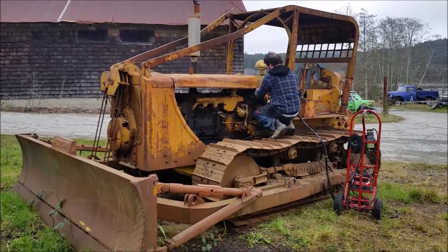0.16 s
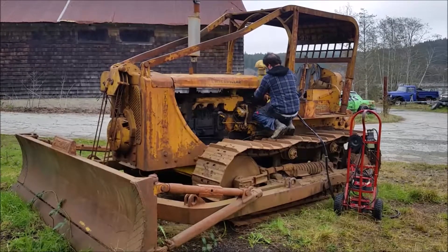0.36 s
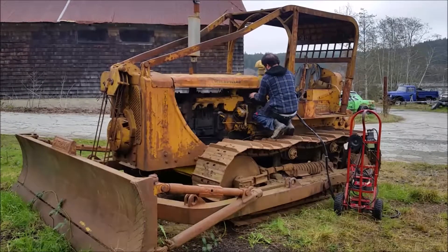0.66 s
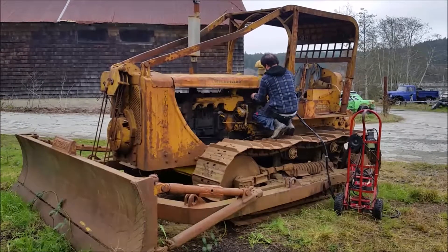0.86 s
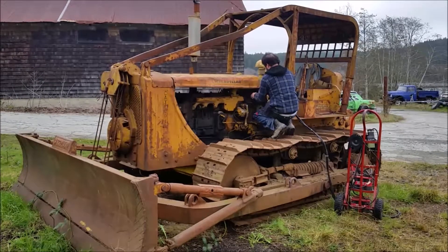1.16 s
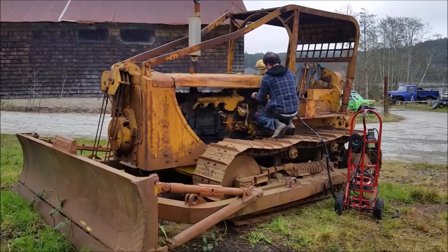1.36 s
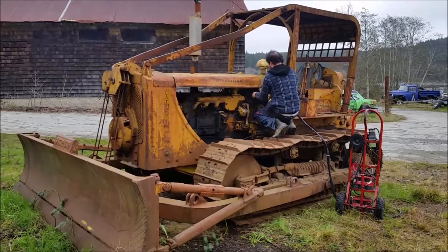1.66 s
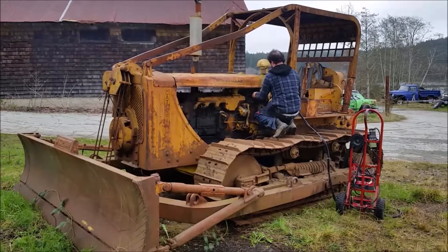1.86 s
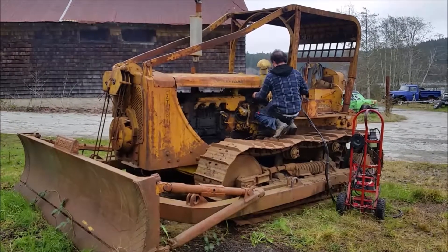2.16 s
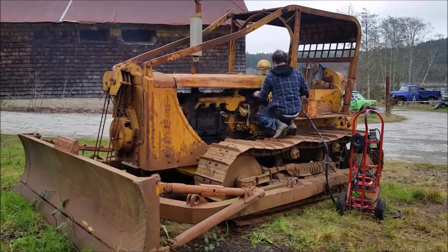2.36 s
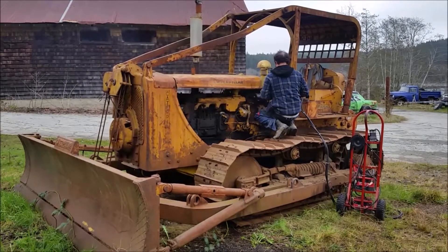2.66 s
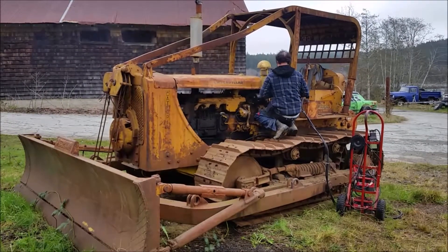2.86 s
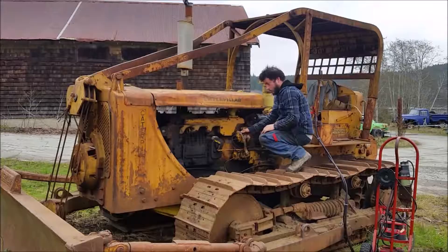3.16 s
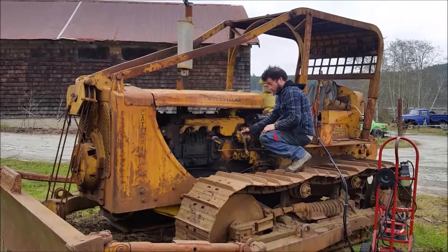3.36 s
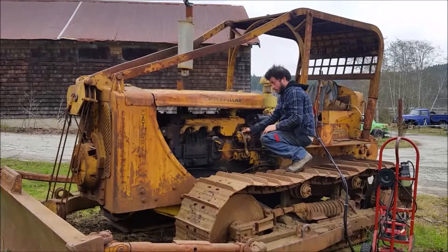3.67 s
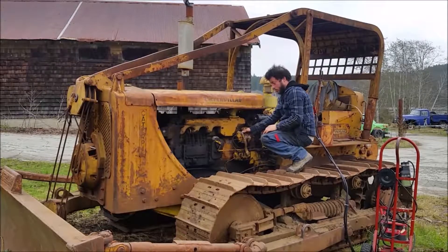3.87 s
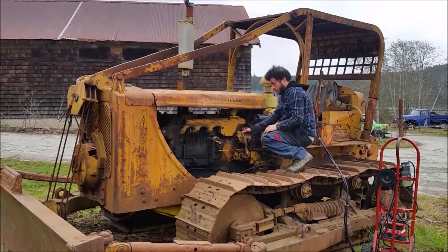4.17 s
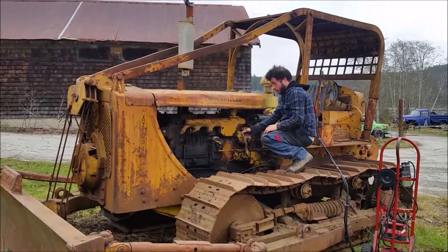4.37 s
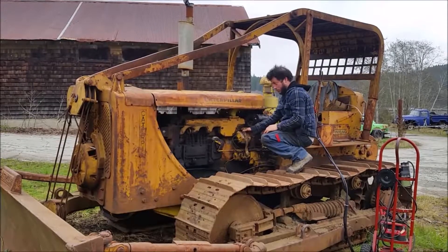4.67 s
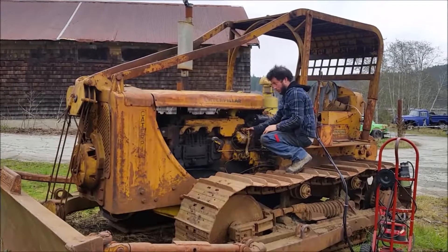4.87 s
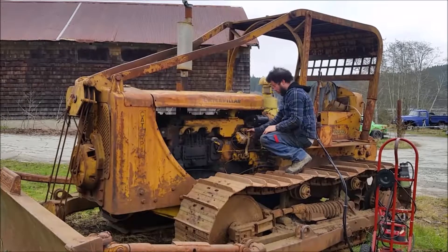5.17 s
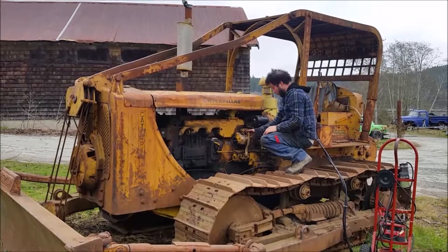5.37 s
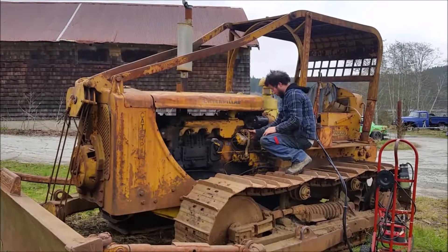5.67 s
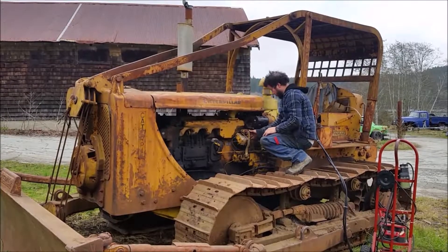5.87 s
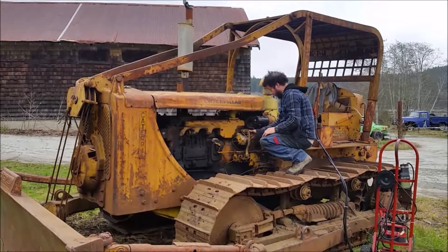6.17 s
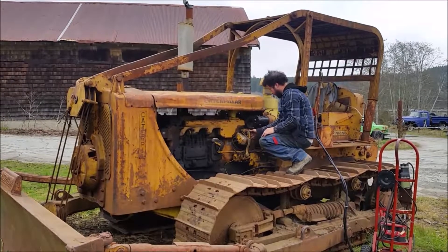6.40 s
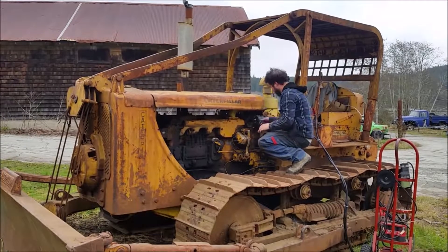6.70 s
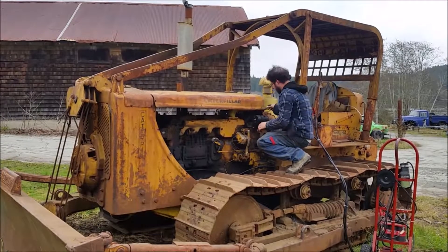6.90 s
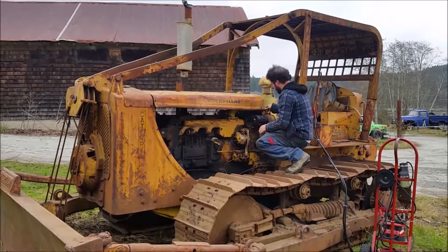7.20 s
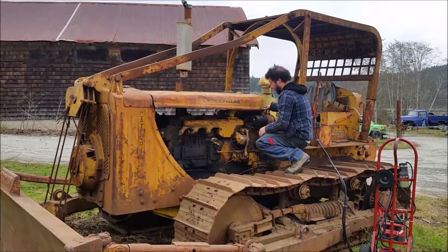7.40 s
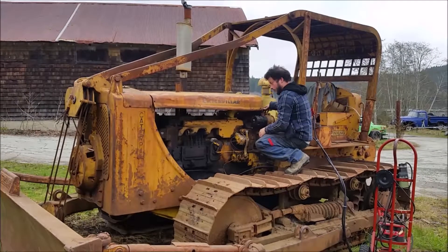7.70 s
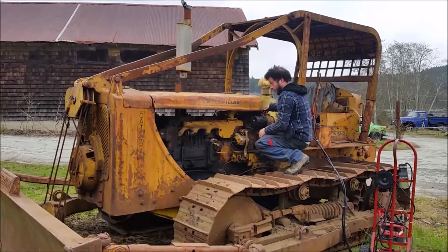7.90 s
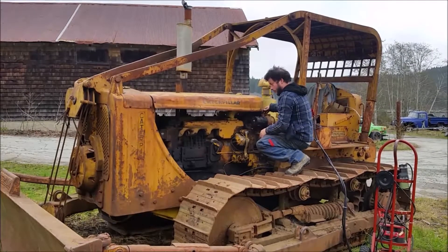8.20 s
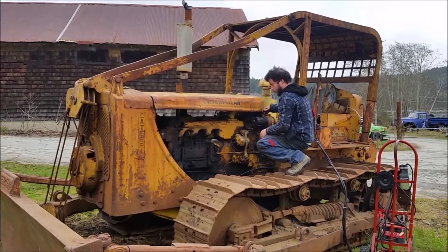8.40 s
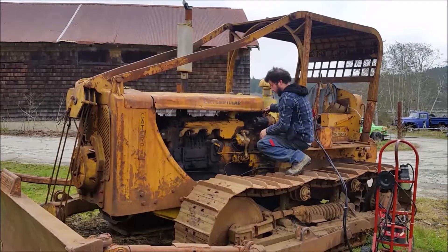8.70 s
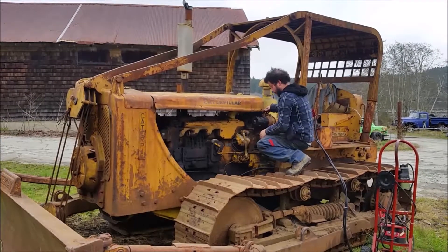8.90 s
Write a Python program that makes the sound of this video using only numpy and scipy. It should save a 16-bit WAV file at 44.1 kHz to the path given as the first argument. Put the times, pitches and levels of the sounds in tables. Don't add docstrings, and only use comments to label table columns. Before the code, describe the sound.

In an open yard, a soft distant engine idles with low pipe beats. A solenoid ticks, a starter grinds and heaves briefly, and an old diesel bulldozer catches with irregular knocks and puffs that quicken. The sound cuts nearly to silence, then fades in from closer: the diesel slows, misfires, and climbs to a fast, hard knocking idle. Outdoor stereo microphone, with dulled top treble.

```python
import sys
import numpy as np
from scipy import signal
from scipy.io import wavfile

SR = 44100
rng = np.random.default_rng(int(sys.argv[2]) if len(sys.argv) > 2 else 0)


def wav_record(signal):
    frames = np.transpose(np.atleast_2d(signal))
    bounded = np.clip(frames, -1, 1)
    quanta = np.round(bounded * 32767).astype(np.int16)
    wavfile.write(sys.argv[1], SR, quanta)


def natural_amplitude(level_db):
    exponent = np.asarray(level_db, float) / 20
    return 10 ** exponent


N = 399091
FAR_END = round(3.27 * SR)

# pitch in Hz, level in dB per Hz.
STARTER_NOISE = [(120, -22), (200, -1), (401, -5), (538, -0.5), (647, 1), (1810, -13), (2420, -19.5),
                 (7540, -18.5), (16000, -20.5)]


def rms_one(x):
    return x / np.sqrt(np.mean(x ** 2) + 1e-20)


def in_time(rows):
    s, *columns = np.transpose(rows)
    return [np.interp(np.arange(N) / SR, s, c, left=-200, right=-200) for c in columns]


def at_hz(points, hz):
    return np.interp(np.log(hz), np.log(np.array(points)[:, 0]), np.array(points)[:, 1])


def clicks(times, sizes):
    out = np.full(N, 1e-18)
    at = np.round(np.asarray(times) * SR).astype(int)
    out[at[at >= 0]] = np.asarray(sizes)[at >= 0]
    return out


def die(x, t60):
    return signal.lfilter([1], [1, -natural_amplitude(-60 / (t60 * SR))], x)


def resonate(x, hz, width_hz):
    r = np.exp(-np.pi * width_hz / SR)
    top = np.array([1, 0, -1]) * (1 - r * r) / 2
    return signal.lfilter(top, [1, -2 * r * np.cos(2 * np.pi * hz / SR), r * r], x)


def flicker(rate, part):
    steps = rng.standard_normal(int(N / SR * 60) + 2)
    steps = signal.lfilter([1], [1, -np.exp(-rate / 10)], steps)
    at = np.arange(part.start, part.stop) * 60 / SR
    return np.interp(at, np.arange(len(steps)), rms_one(steps))


def pair(white, hz, balance=None, likeness=None, lead=None):
    # pitch in Hz, left minus right in dB.
    usual_balance = [(60, 4), (250, -6.5), (640, -7.5), (1410, -15), (3100, -15.5), (6500, -34.5),
                     (9500, -6.5), (14000, -14.5)]
    # pitch in Hz, likeness of left and right (1 is the same).
    usual_likeness = [(60, 0.54), (250, 0.82), (500, 0.65), (1000, 0.94), (2000, 0.79), (4000, 0.56),
                      (15000, 0.28)]
    # pitch in Hz, lead of the left in radians.
    usual_lead = [(0, 0), (2150, 0.79), (3450, 5.5), (4050, -9.5), (4910, 4.5), (8960, 63), (11500, 22.5),
                  (16500, 35)]
    balance, likeness, lead = balance or usual_balance, likeness or usual_likeness, lead or usual_lead
    alike, tilt_db = np.clip(at_hz(likeness, hz), -1, 1), at_hz(balance, hz)
    left, right = np.sqrt(1 + alike) * white[0] + np.sqrt(1 - alike) * white[1] * [[1], [-1]]
    left = np.roll(left, -round(np.interp(hz, *np.transpose(lead)) * SR / (2 * np.pi * hz)))
    return np.array([left * natural_amplitude(tilt_db), right]) * 2 / (1 + natural_amplitude(tilt_db))


def hiss(spectrum, shape, part, **ports):
    low, high = spectrum[0][0], spectrum[-1][0]
    edges = np.geomspace(low, high, int(2.1 * np.log2(high / low)) + 1)
    white, out, power = rng.standard_normal((2, 2, part.stop - part.start)), np.zeros((2, N)), 0
    for k, band in enumerate(zip(edges, edges[1:])):
        hz = np.sqrt(band[0] * band[1])
        band_gain = natural_amplitude(at_hz(spectrum, hz))
        band_filter = signal.butter(2, band, "band", fs=SR, output="sos")
        noise = signal.sosfilt(band_filter, white[k % 2])
        out[:, part] += band_gain * pair(noise, hz, **ports) * shape(hz)
        power += band_gain ** 2 * (band[1] - band[0]) * 4.4 / SR
    return out / np.sqrt(power)


def body(modes, shape, part, strike=None):
    white, out = rng.standard_normal((2, 2, part.stop - part.start)), np.zeros((2, N))
    for k, (hz, width_hz, level_db) in enumerate(modes):
        ringing = resonate(white[k % 2] * shape(hz), hz, width_hz)
        if strike is not None:
            ringing[0] += resonate(strike, hz, 5 * width_hz)
        out[:, part] += natural_amplitude(level_db) * pair(ringing, hz) * (-1) ** k
    return out


def low_ports(x):
    return x * natural_amplitude(np.array([[-.7], [.7]]))


def idler():
    # pitch in Hz, level in dB per Hz.
    yard_colour = [(82, -4.5), (140, 1), (213, -15.5), (246, -10), (346, -33.5), (389, -28), (525, -27),
                   (1620, -29), (1920, -25.5), (2080, -38), (3200, -51), (4160, -76), (7040, -120)]
    # pitch in Hz, level in dB per Hz.
    air_colour = [(1760, -32.5), (3000, -10), (4950, 0), (6610, -24), (7510, -6), (8650, -33), (13500, 0),
                  (16200, -53)]
    # pitch in Hz, width in Hz, level in dB.
    whine_modes = [(390, 17, 1.5), (807, 21, -7.5), (1830, 100, -6.5), (2280, 86, -15.5)]
    # pitch in Hz, left minus right in dB.
    yard_balance = [(60, 5.5), (180, -2.5), (550, -9), (1650, -8.5), (4970, 4.5), (15000, 0)]
    # pitch in Hz, likeness of left and right.
    yard_likeness = [(60, 0.46), (250, 0.68), (1000, 0.52), (4000, .2)]
    # pitch in Hz, lead of the left in radians.
    yard_lead = [(0, 0), (2670, -7.2), (6630, -16), (9650, -4), (14200, -8.2), (16500, -21.2)]
    period_s, wander_s, count = .1229, 0.0024, 13
    times = 0.0021 + period_s * np.arange(count) + wander_s * rng.standard_normal(count)
    strong = clicks(times, np.full(count, natural_amplitude(-19.5)))
    weak = clicks(times + period_s / 2, np.full(count, natural_amplitude(-21)))
    puff = die(die(strong + weak, 0.016), 0.0058)
    boom = resonate(puff, 75.3, 5.6) + 0.75 * resonate(puff, 88.0, 6.7)
    boom = boom + 0.28 * resonate(puff, 61, 22) + 0.1 * resonate(puff, 118, 20)
    boom = low_ports(2.2 * resonate(boom, 75, 37))
    boom[0] = np.roll(boom[0], 19)
    part = slice(0, FAR_END)
    ports = dict(balance=yard_balance, likeness=yard_likeness, lead=yard_lead)
    drone = hiss(yard_colour, lambda hz: natural_amplitude(-42.5 - 3.5 + 3.5 * flicker(23, part)), part, **ports)
    air = hiss(air_colour, lambda hz: natural_amplitude(-83), part, **ports)
    whine = body(whine_modes, lambda hz: natural_amplitude(-42.0 + 2.9 * flicker(11, part)), part)
    return natural_amplitude(-24.0) * boom + drone + air + whine


def solenoid(part):
    # start in seconds, level in dB, pitch in Hz, width in Hz.
    tick_rows = [
        (1.14, -41, 1200, 130),
        (1.188, -41, 850, 300),
    ]
    ticks = 0
    for s, tick_db, hz, width_hz in tick_rows:
        click = clicks([s], [natural_amplitude(tick_db)])
        fall, hum = die(click, 0.03)[part], die(click, 0.12)[part]
        ticks = ticks + body([(hz, width_hz, 20)], lambda hz: fall, part)
        ticks = ticks + hiss(STARTER_NOISE, lambda hz: 0.24 * hum, part)
    return ticks


def heaving(part):
    # start in seconds, treble over the grind in dB.
    heave_rows = [
        (1.186, -6.5),
        (1.212, -11),
        (1.297, -7),
        (1.35, -4),
        (1.43, -9.5),
        (1.484, -0.5),
    ]
    fall_db_per_s = 120
    t = np.arange(part.start, part.stop) / SR
    return np.max([np.where(t >= s, db - fall_db_per_s * (t - s), -40) for s, db in heave_rows], axis=0)


def starter():
    # time in seconds, grind in dB.
    effort_rows = [
        (1.186, -50),
        (1.209, -43),
        (1.214, -30.5),
        (1.47, -29),
        (1.5, -37.5),
        (1.525, -58),
    ]
    # pitch in Hz, width in Hz, level in dB.
    housing_modes = [(279, 13, 4), (537, 9.3, 8), (810, 15, 1.5), (1106, 31, 1), (1827, 41, 1),
                     (2820, 41, -5), (3500, 150, -27.5), (4200, 90, -22), (4760, 45, -22), (7410, 110, -14),
                     (7660, 53, -21)]
    part = slice(SR, 8 * SR // 5)
    top_db = heaving(part)
    level_db = in_time(effort_rows)[0][part] + 0.22 * (top_db + 13.5)
    teeth_hz = 269.6 * (1 + .025 * flicker(15, part))
    tooth = np.cumsum(teeth_hz / SR) % 1
    bite = np.exp(-1.5 * tooth)
    contacts = 3.0 * natural_amplitude(level_db + 4.5) * (np.diff(tooth, prepend=0) < 0)

    def singing(hz):
        return natural_amplitude(level_db + 9.5 + (hz > 2500) * (top_db + 8.5) + 0.99 * flicker(25, part))

    def grinding(hz):
        return bite * natural_amplitude(level_db + 0.5 + (hz > 4000) * (top_db + 9.5) + 1.6 * flicker(27, part))

    return body(housing_modes[:6], singing, part, contacts) + hiss(STARTER_NOISE, grinding, part)


def catching():
    # time in seconds, knock peak in dB, exhaust thump in dB.
    catch_rows = [(1.531, -13, -24), (1.598, -21, -35), (1.67, -18, -24), (1.727, -27.5, -35),
                  (1.793, -13, -22.5), (1.881, -17, -25), (1.927, -28, -29), (1.971, -19, -35),
                  (2.043, -13, -23.5), (2.162, -14, -24), (2.263, -11, -21), (2.362, -14, -22.5),
                  (2.404, -45, -59), (2.655, -42, -47), (2.955, -31, -46)]
    pickup_s, first_gap_s, last_gap_s, gap_shrinks = 2.4495, .0847, .062, .868
    turn = np.arange(11)
    gaps = last_gap_s + (first_gap_s - last_gap_s) * gap_shrinks ** turn
    times = pickup_s + np.cumsum(gaps) - gaps
    soft, chance = turn % 2, rng.standard_normal((len(turn), 2))
    knock_db = np.where(soft, -14, -11) + 0.46 * chance[:, 0]
    thump_db = np.where(soft, -21.5, -22) + 2.9 * chance[:, 1]
    return sorted(list(catch_rows) + list(zip(times, knock_db, thump_db)))


def exhaust(times, level_db, echoes, stack, pulse_hz, width_hz, stack_db):
    push = die(clicks(times, natural_amplitude(level_db)), 0.02)
    blunt = signal.butter(2, 320, fs=SR, output="sos")
    puff = signal.sosfilt(blunt, resonate(push, pulse_hz, width_hz))
    out = np.zeros(N)
    for delay_s, gain in echoes:
        lag = round(delay_s * SR)
        out[lag:] += gain * puff[:N - lag]
    faster_db = -6.0 * np.log2(np.minimum(np.gradient(times), .1) / 0.035)
    turn, ring = (-1) ** np.arange(len(times)), 0
    for k, (hz, wide_hz, db) in enumerate(stack):
        uneven_db = 3.5 * turn * (-1) ** k + rng.standard_normal(len(times))
        hit_db = level_db + db + faster_db * np.sign(hz - 120) + uneven_db
        hits = die(clicks(times, natural_amplitude(hit_db)), 0.006)
        ring = ring + (-1) ** k * resonate(hits, hz, wide_hz)
    return low_ports(out) + natural_amplitude(stack_db) * ring * natural_amplitude(np.array([[-3.5], [2.5]]))


def diesel(firings, puffs, block, clatter, echoes, stack, rattle_db, part,
           knock_db, strike, clatter_db, thump_db, rumble_db, tail_s, pulse_hz, blow_s, spread_db):
    # pitch in Hz, level in dB per Hz.
    rumble_colour = [(28, -26), (40, -10), (60, -10), (100, -8), (160, -11), (300, -14), (480, -24)]
    times, peak_db = np.transpose(firings)[:2]
    rattle_db = rattle_db[part]

    def blow(hz):
        uneven_db = spread_db * rng.standard_normal(len(times))
        hits = clicks(times - .0005, natural_amplitude(peak_db + uneven_db))[part]
        lasting_s = blow_s * np.clip(1300 / hz, 1, 3) ** 2.16
        return np.hypot(die(hits, lasting_s) * np.sqrt(blow_s / lasting_s), natural_amplitude(rattle_db - 9.0))

    def after(hz):
        bright = np.clip(np.log2(hz / 4500), 0, 1)
        hits = clicks(times - .0005, natural_amplitude(peak_db + 2.0 * rng.standard_normal(len(times))))[part]
        swell = die(hits, tail_s) - die(hits, 0.013 + 0.0013 * bright)
        swell = swell + 0.067 * (1 - bright) * die(hits, 0.025)
        between = natural_amplitude(rattle_db - 13.0 - 7.4 * bright + 2.0 * flicker(34, part))
        return np.hypot(natural_amplitude(clatter_db) * swell, between)

    def shaking(hz):
        return natural_amplitude(rattle_db + rumble_db + 2.0 * flicker(2.7, part))

    crack = strike * clicks(times, natural_amplitude(peak_db))[part]
    knock = natural_amplitude(knock_db) * body(block, blow, part, crack)
    thump = exhaust(puffs[0] - .004, puffs[1] + thump_db, echoes, stack, pulse_hz, width_hz=70, stack_db=11.5)
    return knock + hiss(clatter, after, part) + thump + hiss(rumble_colour, shaking, part)


def valves(firings, part):
    # pitch in Hz, width in Hz, level in dB.
    valve_modes = [(830, 31, 9.5), (1500, 730, -2.5), (1630, 110, 0.5)]
    times, peak_db = np.transpose(firings)[:2]
    midway = (times[1:] + times[:-1]) / 2
    slap_db = peak_db[1:] - 12 + 2.0 * rng.standard_normal(len(midway))
    slaps = clicks(midway, natural_amplitude(slap_db))[part]
    fall = die(slaps, 0.14) - die(slaps, 0.011)
    return body(valve_modes, lambda hz: fall, part)


def far_diesel():
    # pitch in Hz, width in Hz, level in dB.
    far_block = [(490, 48, -3), (860, 31, -2), (1292, 43, -10), (2724, 67, -15.5), (3350, 160, -22.5),
                 (4190, 31, -18), (4580, 30, -24.5), (5100, 21, -34)]
    # pitch in Hz, level in dB per Hz.
    far_clatter = [(150, -6.5), (250, -22.5), (712, -4.5), (848, -5), (2420, -16), (2780, -24.5),
                   (6200, -16), (7390, -18.5), (9110, -21.5), (10500, -3), (16200, -19.5)]
    # delay in seconds, gain.
    far_echoes = [(0, -0.3), (.004, -0.65), (0.01, 0.64), (.021, -0.96), (.039, -0.83)]
    # pitch in Hz, width in Hz, level in dB.
    far_stack = [(43, 15, -9), (99, 18, -4), (166.7, 24, -7), (215, 61, -11), (310, 16, -7.5)]
    # time in seconds, rattle in dB.
    far_gear = [
        (1.5, -28),
        (1.552, -27.5),
        (3.06, -28),
        (3.22, -25.5),
    ]
    firings, part = catching(), slice(SR, FAR_END)
    engine = diesel(firings, np.transpose(firings)[::2], far_block, far_clatter, far_echoes, far_stack,
                    in_time(far_gear)[0], part, knock_db=14.0, strike=2.0, clatter_db=-13.5, thump_db=8.5,
                    rumble_db=-11, tail_s=0.17, pulse_hz=94.4, blow_s=0.02, spread_db=3)
    return engine + valves(firings, part)


def cut_away(yard):
    # time in seconds, level in dB.
    cut_rows = [
        (3.22, 8),
        (3.227, -12),
        (3.246, -32),
        (3.253, -80),
    ]
    cut_db = np.interp(np.arange(N) / SR, *np.transpose(cut_rows))
    low = signal.sosfilt(signal.butter(1, 2000, fs=SR, output="sos"), yard)
    top_db = cut_db[0] + 4.6 * (cut_db - cut_db[0])
    return low * natural_amplitude(cut_db) + (yard - low) * natural_amplitude(top_db)


def running():
    # time in seconds, firings per second.
    speed_rows = [(3.268, 28.7), (3.49, 25.08), (4.48, 19.51), (4.78, 19.06), (5.03, 19.75), (5.08, 20.48),
                  (5.71, 23.84), (6.36, 28.33), (6.78, 30.54), (7.22, 33.71), (8.3, 35.63), (9.05, 35.44)]
    # time in seconds, knock peak in dB.
    fade_rows = [(3.25, -52), (3.34, -39.5), (3.55, -31), (3.9, -24), (4.4, -16.5), (4.95, -12.5),
                 (5.5, -11), (6.1, -8), (6.75, -7), (7.3, -8.5), (8.3, -8), (9.05, -7.5)]
    # time in seconds, change of the knock in dB.
    misfire_rows = [(3.305, -8), (3.614, -16), (3.78, -18), (3.954, -15), (4.328, -8), (4.529, -17),
                    (5.047, -19), (7.599, -3), (8.425, -38), (8.537, -24), (8.65, -8.5), (8.706, -14),
                    (8.763, -35), (8.819, -32), (8.932, -2), (8.988, -25)]
    t, start_s = np.arange(N) / SR, speed_rows[0][0]
    speed = np.interp(t, *np.transpose(speed_rows))
    turned = np.cumsum(speed * (t >= start_s)) / SR
    slot = np.arange(int(turned[-1]) + 1)
    times = np.maximum(np.interp(slot, turned, t), start_s)
    lost_db = np.zeros(len(slot))
    for s, db in misfire_rows:
        lost_db[np.argmin(np.abs(times - s))] = db
    level_db = np.interp(times, *np.transpose(fade_rows))
    early = 2 * (slot % 2) - 1
    rebound_db = -0.1 * np.roll(lost_db, 1)
    knock_db = level_db + lost_db + rebound_db + 0.6 * early + 1.01 * rng.standard_normal(len(slot))
    puff_db = level_db + 0.56 * lost_db - 14.5 - .3 * (np.interp(times, t, speed) - 25)
    rattle_db = in_time(fade_rows)[0] - 13 + 0.195 * (speed - 25)
    return np.transpose([times - .0005 * early, knock_db]), (times, puff_db), rattle_db


def near_diesel():
    # pitch in Hz, width in Hz, level in dB.
    near_block = [(537.4, 27, -13.5), (822, 52, -7), (1024, 75, -12.5), (1459, 30, -9), (1695, 69, -5.5),
                  (2239, 115, -10.5), (4840, 47, -17.5), (5360, 57, -20),
                  (752.4, 30.6, -7), (1373, 51, -11.5), (2265, 66, -11.5), (2573, 22.4, -9.5)]
    # pitch in Hz, level in dB per Hz.
    near_clatter = [(260, -25), (440, -8), (769, -11), (1250, -9.5), (1710, -6), (1990, -18), (2240, -16.5),
                    (3860, -16.5), (5470, -14.5), (8990, -12.5), (14800, -15.5), (16200, -29)]
    # delay in seconds, gain.
    near_echoes = [(0, -0.057), (.004, -1.09), (0.016, -.6), (.024, -0.85)]
    # pitch in Hz, width in Hz, level in dB.
    near_stack = [(62, 22.2, -6.5), (156, 12.5, -7), (225.6, 13.8, 0), (266, 52, -3), (351, 24, -2),
                  (530, 6.3, -23)]
    # pitch in Hz, width in Hz, level in dB.
    belt_modes = [(5450, 106, -5)]
    knocks, puffs, rattle_db = running()
    part = slice(3 * SR, N)
    near = diesel(knocks, puffs, near_block, near_clatter, near_echoes, near_stack,
                  rattle_db, part, knock_db=14.5, strike=2.9, clatter_db=-12.0, thump_db=11.5,
                  rumble_db=-12, tail_s=0.074, pulse_hz=102.6, blow_s=0.023, spread_db=1)
    near = near + body(belt_modes, lambda hz: natural_amplitude(rattle_db[part] - 2.5), part)
    return near - 0.67 * resonate(near, 399, 73)


def scene():
    yard = idler() + solenoid(slice(SR, 8 * SR // 5)) + starter() + far_diesel()
    yard = yard + 2.35 * resonate(yard, 7540, 430)
    near = near_diesel()
    return cut_away(yard) + near + 0.22 * resonate(near, 7600, 530)


def top_cut(x):
    return signal.sosfilt(signal.butter(12, 16990, fs=SR, output="sos"), x)


def record(dry):
    # pitch in Hz, width in Hz, dip in dB.
    port_dips = [(6290, 630, -4.5), (8970, 2100, -12.5), (12110, 1630, -25)]
    x = 1.3 * np.tanh(dry / 1.3)
    for hz, width_hz, dip_db in port_dips:
        x = x - (1 - natural_amplitude(dip_db)) * resonate(x, hz, width_hz)
    x = signal.sosfilt(signal.cheby2(10, 30, 16250, fs=SR, output="sos"), x)
    return top_cut(x)


dry = scene()
out = record(dry)
wav_record(out)
```